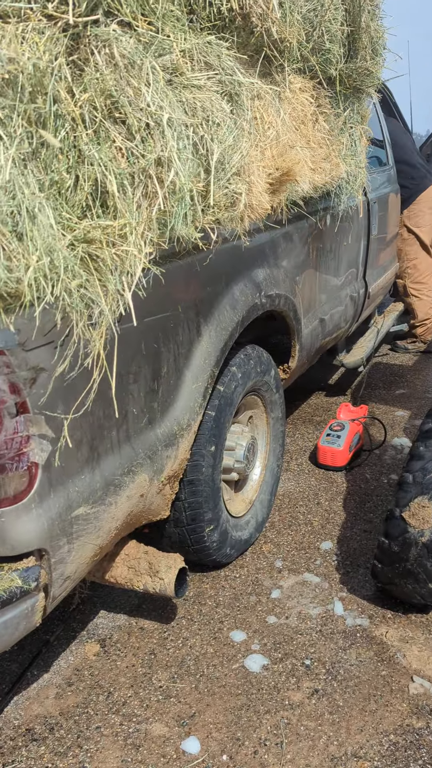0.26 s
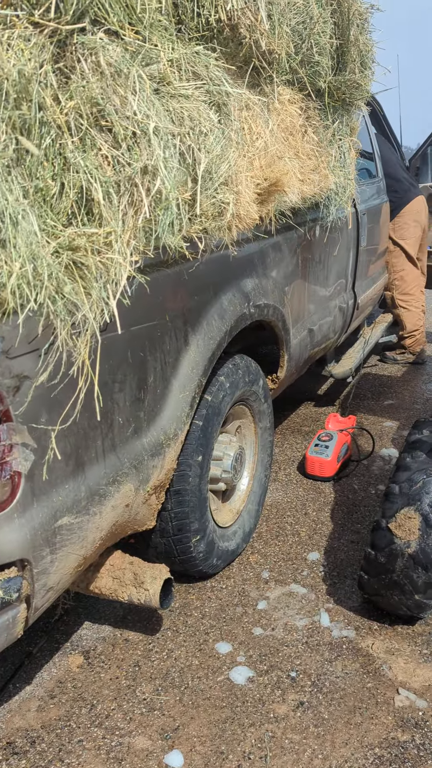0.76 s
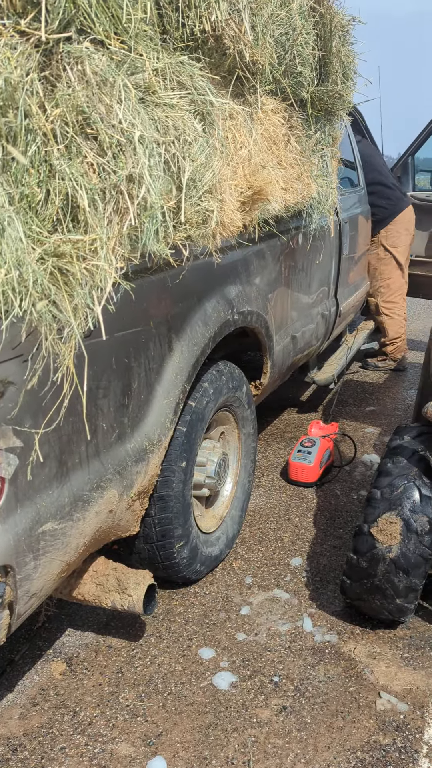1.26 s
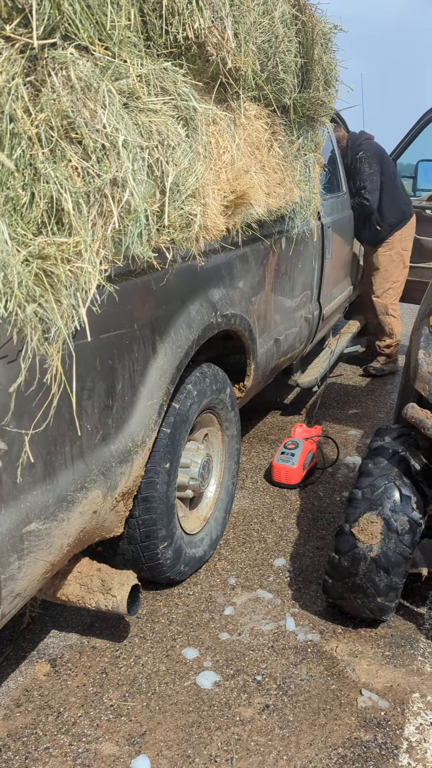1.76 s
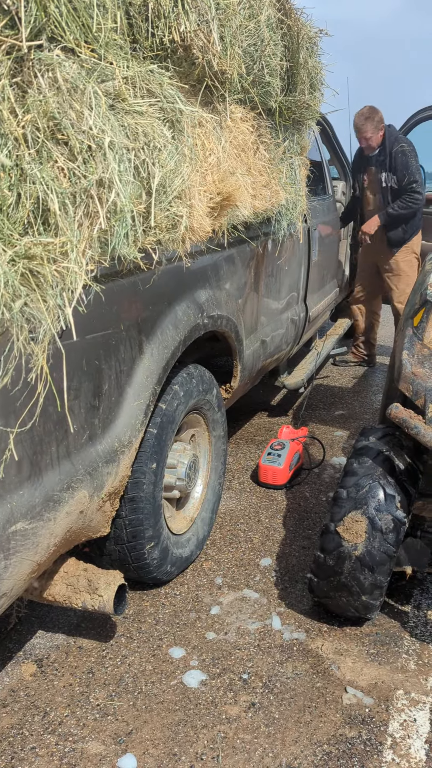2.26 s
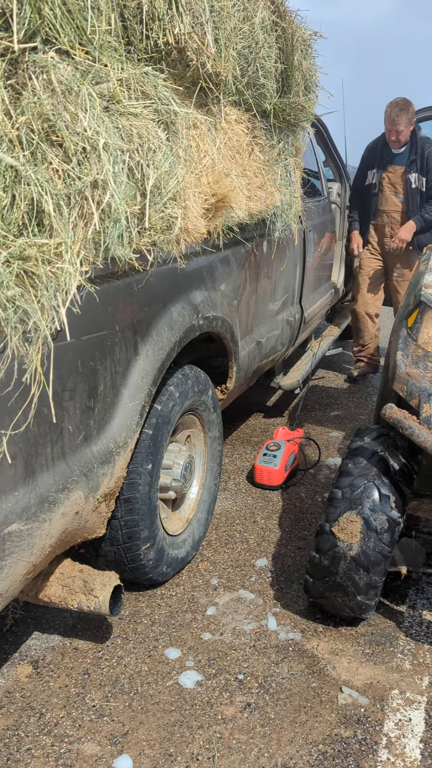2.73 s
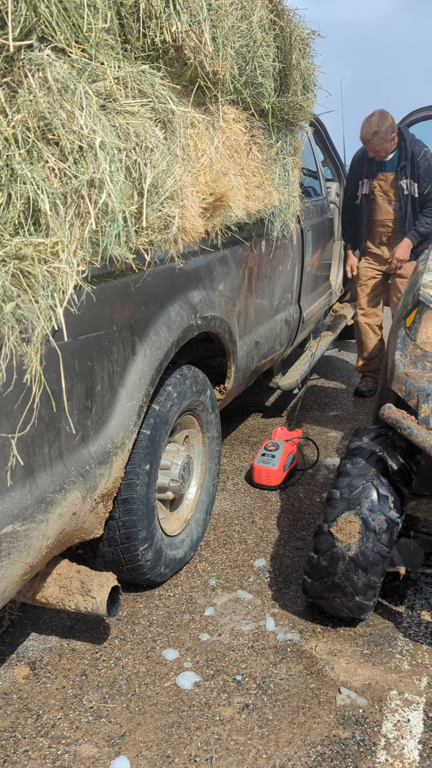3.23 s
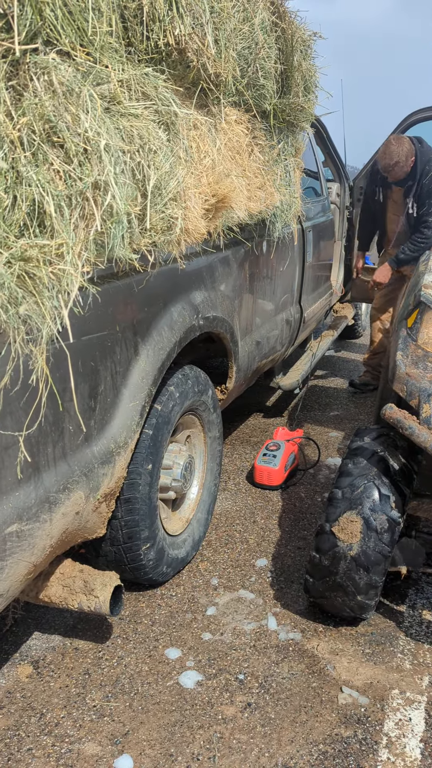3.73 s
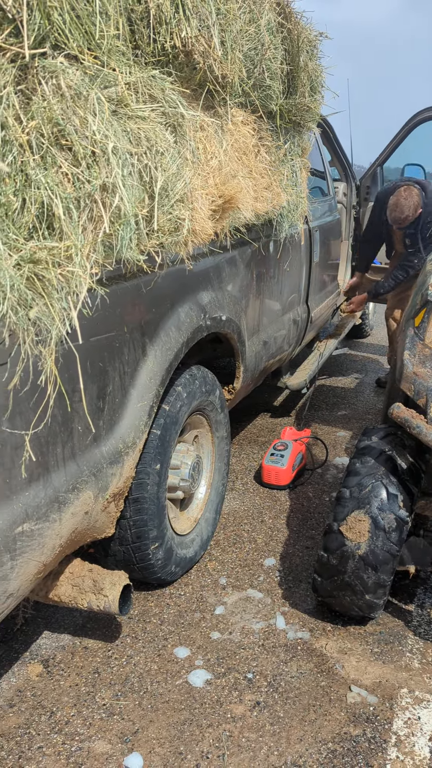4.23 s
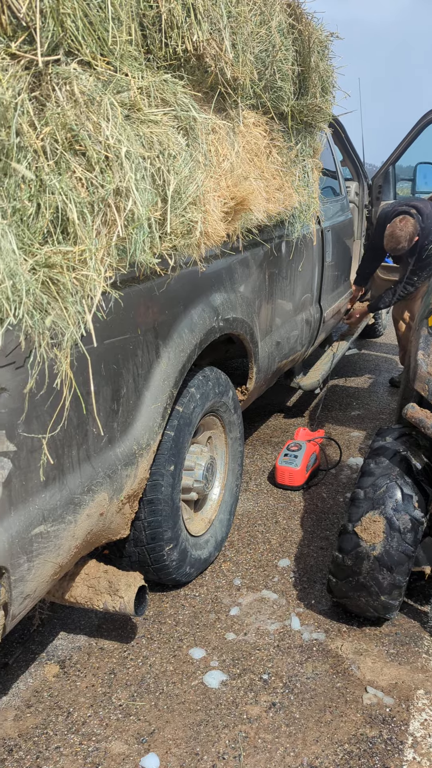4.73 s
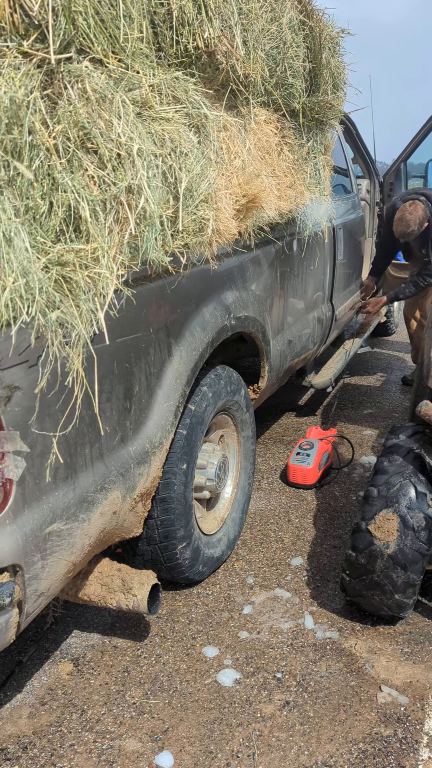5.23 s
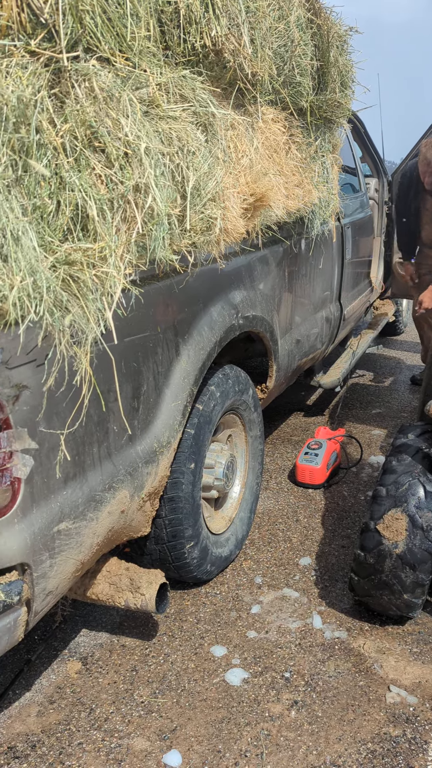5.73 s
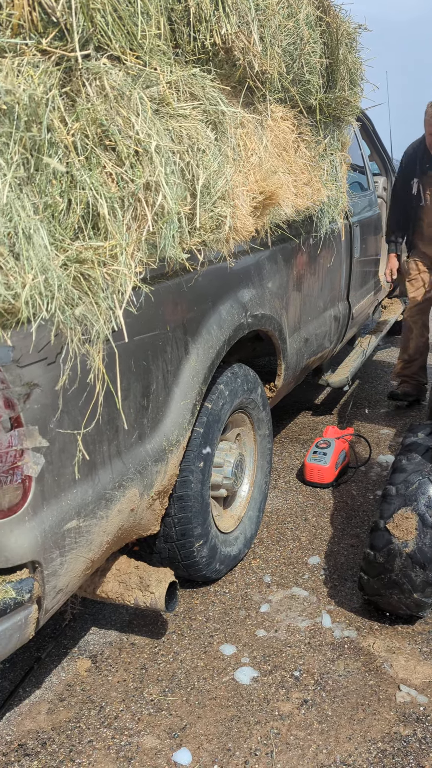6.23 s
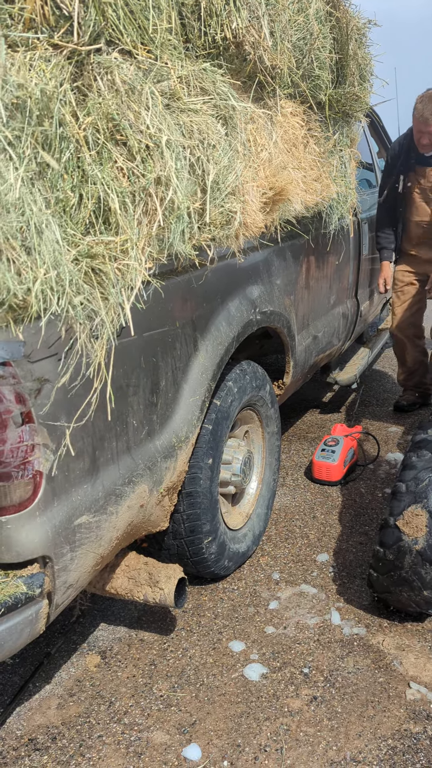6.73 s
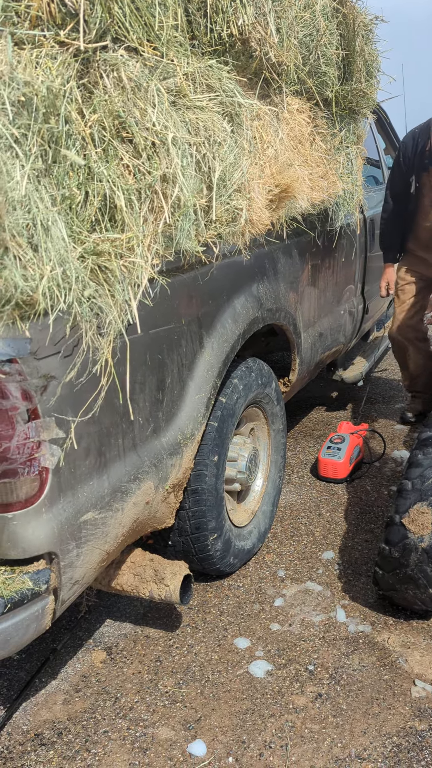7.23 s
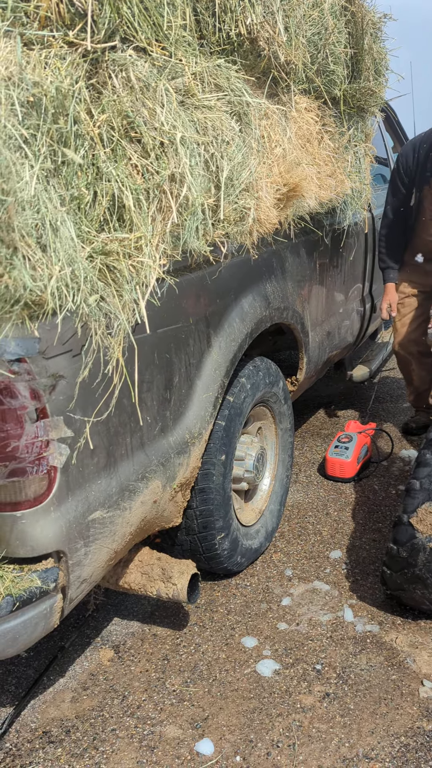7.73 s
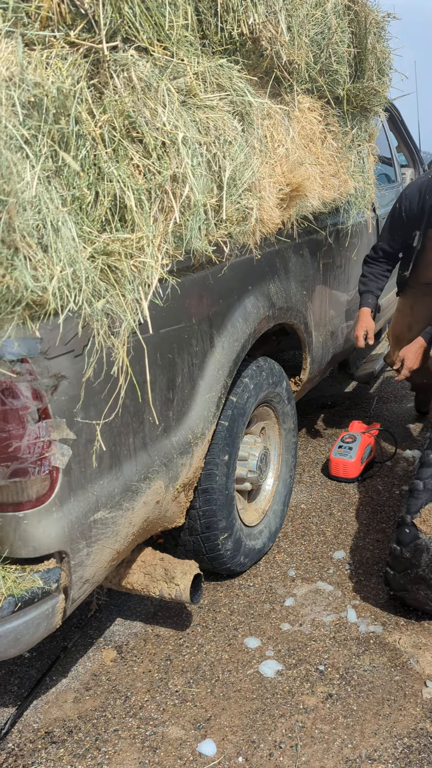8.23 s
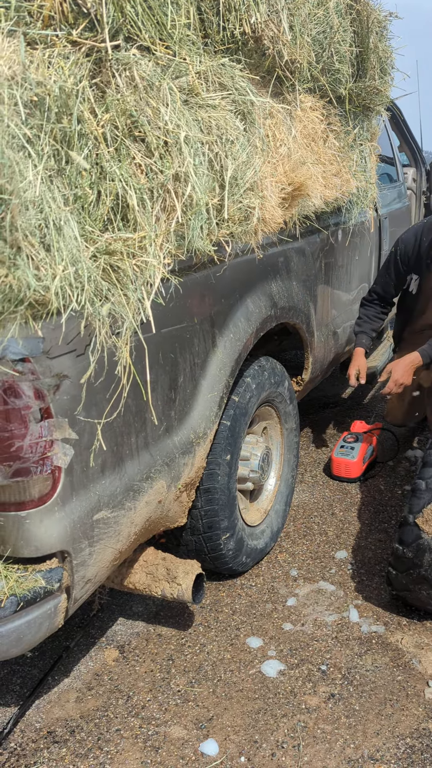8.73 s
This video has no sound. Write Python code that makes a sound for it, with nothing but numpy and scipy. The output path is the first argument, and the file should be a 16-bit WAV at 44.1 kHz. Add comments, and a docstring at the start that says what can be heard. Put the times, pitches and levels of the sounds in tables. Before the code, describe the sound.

A portable tire inflator starts beside a truck outdoors. Quiet airy rush comes first; the pump then catches abruptly and becomes a dense, hard plastic buzz of about fifty strokes per second. It loosens into a more uneven clatter and holds steadily. A low idle lies underneath, and wind buffets the left side of the nearby stereo handheld microphone, with faint short reflections from the truck.

```python
"""A soft rush of open air and a flutter of wind come first, with a truck idling faintly and then fuller beneath.
A small electric piston pump switches on to inflate a tire: its whine sums multiples of the crank speed, while
bursts of noise from valve, gears and air shake a resonant plastic shell and echo from the truck.
About two seconds later the pump runs faster and looser. Wind, as swells of low noise, flutters now and then,
mostly on the left microphone port."""
import sys
import numpy as np
from scipy.fft import rfft, irfft, next_fast_len
from scipy.io import wavfile
from scipy.ndimage import map_coordinates

SR = 44100
rng = np.random.default_rng(int(sys.argv[2]) if len(sys.argv) > 2 else 0)


def transcribe(u):
    """Save the signal u as a 16-bit wav file named by the first command-line argument.

    u: samples, shape (n,) or (channels, n), limited to [-1, 1]; the rate is SR.
    q: integer samples, one column per channel.
    """
    v = np.clip(np.atleast_2d(u).T, -1, 1)
    q = np.round(v * 32767).astype(np.int16)
    wavfile.write(sys.argv[1], SR, q)


N = 396459

# Open air and engine-bay rush, spectral shape: hz, relative_db_per_hz
AIR_SPECTRUM = [(25, -32), (42, -4), (65, -7.5), (120, -1.5), (160, -7), (209, 0.5), (290, -9), (490, -11),
                (800, -12), (1000, -22), (1450, -15.5), (6200, -23), (8130, -32.5), (15500, -36)]
# Open air, mean level: time_s, level_db
AIR_LEVEL = [(0, -56), (.6, -57), (.9, -54), (9, -52)]
# Wind eddies at set times, loud and soft: peak_s, left_level_db, length_s, centre_hz, right_minus_left_db
TIMED_EDDIES = [(0.067, -46, 0.049, 219, -17), (.3, -59.5, .045, 440, 4), (.54, -56, 0.011, 200, 3),
                (1.614, -40, 0.02, 121, -6), (1.777, -30, 0.0033, 240, -10),
                (5.448, -37.5, 0.021, 169, -22), (5.558, -40.5, 0.029, 287, -14),
                (6.215, -30.5, .022, 312, -21), (6.261, -32, 0.015, 140, -12), (6.573, -36, .017, 212, -12),
                (7.128, -42, .03, 120, -12), (7.461, -38, 0.031, 216, -2), (7.649, -46, 0.049, 115, -7)]
# Exhaust puff, spectral shape: hz, relative_db_per_hz
PUFF_SPECTRUM = [(25, -36), (45, -32), (70, 7.5), (105, 7), (200, 6.5), (280, -10), (500, -6.5),
                 (1200, -55)]
# Engine hum, before the swell and waver: multiple_of_engine_speed (rounded in use), level_db
IDLE_HUM_ORDERS = [(4, -78), (5, -66.5), (8, -75), (9, -68.5), (12, -66.5)]
# Looseness of the piston stroke: time_s, looseness (0-1)
LOOSENESS = [(2.5, 0), (2.72, 1)]
# Crank harmonics at full drive, before force and waver:
# multiple_of_crank_speed (rounded in use), tight_db, loose_db
WHINE_ORDERS = [(6.03, -62, -65), (10.01, -65, -61), (10.99, -51.5, -51.5), (11.966, -47.5, -48),
                (13, -48, -58.5), (13.97, -87, -63), (15, -58, -61), (16.97, -63, -66.5),
                (19, -58.5, -65.5), (20, -83, -60), (21.94, -57, -62.5), (23.94, -61.5, -57),
                (24.93, -48.5, -58), (26.05, -53, -66.5), (32, -60, -53.5), (37, -57.5, -55),
                (38.9, -52, -74), (40, -56, -72), (41.33, -51, -55.5), (51, -55, -75), (52.64, -85, -55.5),
                (69.2, -57.5, -64)]
# Bursts in each crank turn, against the steady noise, before force and scatter:
# place_in_turn (0-1), length_turns, tight_db, loose_db, low_hz, high_hz
STROKE_BURSTS = [(0.97, 0.049, 3, 2, 370, 796), (0.67, 0.078, 5.5, 2, 620, 1427),
                 (0.93, 0.14, 4, 2, 1420, 2625), (0.64, 0.42, 0.5, 1.5, 2690, 4970),
                 (0.74, 0.2, 5, 4, 4940, 7500), (0.5, 0.12, 1, 2, 7370, 15500)]
# Likeness of the pump noise in left and right: hz, correlation (0-1)
PUMP_LIKENESS = [(300, 0.48), (650, 1), (1200, 0.71), (2000, 1), (5000, 0.43), (15000, 0.63)]
# Broad response of the plastic shell: hz, relative_db_per_hz
SHELL_RESPONSE = [(330, -42), (450.0, -33), (560.0, -7.5), (900.0, -4.5), (1400.0, -10), (1900.0, 1.5),
                  (2800.0, -2.5), (3800.0, -4), (5000.0, -11.5), (7300.0, -9.5), (9500.0, -11),
                  (12000.0, -7.5), (13500.0, -16.5), (15600.0, -7)]
# Resonances and dips of the shell: centre_hz, width_hz, lift_db
SHELL_RESONANCES = [(593, 170, 6.5), (939, 20, 8), (1270, 99, 10), (1506, 133, 10), (1623, 35, 8),
                    (1831, 50, 6.5), (2112, 376, 6.5), (2566, 32, 6.5), (2770, 70, -4.5), (2870, 260, 3),
                    (3310, 92, 5.5), (3410, 190, 3.5), (3800, 190, -4.5), (4327, 205, 7.5),
                    (5040, 135, -2.5), (5804, 1280, 12), (6600, 300, 5.5), (6860, 250, -3.5),
                    (10200, 1100, 5)]
# Echoes from the truck's side and wheel: mean_delay_s, gain (linear)
PANEL_ECHOES = [(.0029, 0.087), (.0047, 0.15)]
# Rattle drive, before a common gain in pump(): time_s, level_db
RATTLE_LEVEL = [(.8, -39), (2.8, -40.2), (6.1, -40.5), (7.2, -39.5)]
# Treble hiss drive, before a common gain and flicker in pump(): time_s, level_db
HISS_LEVEL = [(.8, -47), (2.2, -46.5), (2.7, -48), (5.1, -46.5), (6.4, -48), (6.8, -49.5), (9, -47)]
# Gain of the rattle's lower middle: time_s, gain_db
MIDDLE_GAIN = [(2.3, 1), (2.8, -3), (6.2, -3), (8.4, 6)]
# Level difference of the pump between the sides: hz, left_minus_right_db
PUMP_PAN_CURVE = [(300, -3.5), (620, 0.7), (1000, 2.5), (1290, -0.5), (1700, 0), (2100, -0.5), (3100, 7),
                  (4300, -5.5), (5800, -11), (7000, -2), (8200, -6), (11000, -1), (13000, .5)]

# Random faint eddies: eddies per s, mean left level and half-range (dB), length (s), centre (Hz),
# right minus left (dB)
FAINT_PER_S = 1.5
FAINT_DB, FAINT_SCATTER_DB, FAINT_S, FAINT_HZ, FAINT_RIGHT_DB = -51.5, 4, 0.012, 290, -0.5
# One longer gust: peak (s), length (s), left level (dB), centre (Hz), right minus left (dB)
GUST_AT, GUST_S, GUST_DB, GUST_HZ, GUST_RIGHT_DB = 6.28, 0.22, -41, 167, -18
SWITCH_ON_S = .673
# Crank speed (turns per s): under load, extra until the hose fills, extra at full looseness
TURN_RATE, UNLOADED_RATE, LOOSE_RATE = 50.5, .4, .45
# Filling time of the hose (s), speed gain while loose (turns per s each s), crank position at rest (turns)
FILL_S, CLIMB_PER_S, REST_PLACE = .45, .12, .92
# Drive (0-1) of the first stir and of the catching piston; rise of the stir (s)
STIR_SHARE, CATCH_SHARE, STIR_S = .06, 0.26, 0.01
# Delay of the catch, its rise, and time constant of the build-up to full drive (s)
CATCH_AFTER_S, CATCH_S, BUILD_S = 0.019, 0.0062, 0.064
MIDDLE_HZ, MIDDLE_WIDTH_HZ = 1200, 220  # centre and standard deviation of the lower middle
FLICKER_DB, FLICKER_RATE = 1.07, 7.7  # treble flicker: scale (dB), random knots per s
TOP_HZ = 15830


def amp(db):
    """Logarithmic level: decibels become an amplitude ratio."""
    return 10 ** (np.asarray(db) / 20)


def unit(x):
    """Normalisation: x is brought to root-mean-square 1."""
    return x / np.sqrt(np.mean(x ** 2) + 1e-20)


def along(points, hz):
    """Spectral interpolation: (hz, value) points are joined on a logarithmic frequency axis."""
    f, v = np.transpose(points)
    return np.interp(np.log(hz + 1), np.log(f + 1), v)


def curves(rows):
    """Linear interpolation in time: one value per sample for each column after time_s."""
    s, *cols = np.transpose(rows)
    return [np.interp(np.arange(N) / SR, s, c) for c in cols]


def wobble(rate):
    """Slow random fluctuation: a smooth curve through chance values, rate knots per s."""
    coarse = np.arange(0, N + 32, 32)
    knots = rng.standard_normal(4000)
    coarse_curve = map_coordinates(knots, [coarse * rate / SR], mode="wrap")
    return np.interp(np.arange(N), coarse, coarse_curve)


def filtered(x, response):
    """Linear filtering: the spectrum of x is multiplied by a complex response of frequency."""
    size = next_fast_len(N + 8192)
    hz = np.fft.rfftfreq(size, 1 / SR)
    return irfft(rfft(x, size) * response(hz), size)[..., :N]


def spread(pair, alike):
    """Partial coherence: two unrelated signals mix into left and right of the given correlation."""
    turn = lambda hz: np.arccos(np.clip(along(alike, hz), -1, 1)) / 2
    mid, side = filtered(pair, lambda hz: np.array([np.cos(turn(hz)), np.sin(turn(hz))]))
    return np.array([mid + side, mid - side])


def outdoors():
    """Broadband turbulence: shaped noise gives the engine-bay rush and open air, gently wavering."""
    noise = spread(rng.standard_normal((2, N)), [(50, 0.25), (200, 0.82), (1000, 0.77), (6000, 0.1)])
    rush = unit(filtered(noise, lambda hz: amp(along(AIR_SPECTRUM, hz))))
    level_db = curves(AIR_LEVEL)[0] + 0.94 * wobble(7)
    return amp(level_db) * rush


def flutter(t, db, length, centre_hz, right_db, width_octaves=0.79, top_hz=480):
    """Local wind pressure: low noise swells around t = 0, independent on the two ports."""
    hz = np.fft.rfftfreq(len(t), 1 / SR) + 1
    octaves = np.log2(hz / centre_hz)
    colour = np.exp(-.5 * (octaves / width_octaves) ** 2) / (1 + (hz / top_hz) ** 8)
    swell = np.exp(-.5 * (t / length) ** 2)
    noise = irfft(rfft(rng.standard_normal((2, len(t))) * swell) * colour, len(t))
    # each port receives the energy of the swell at its own level
    noise = noise * np.linalg.norm(swell) / np.linalg.norm(noise, axis=1, keepdims=True)
    return amp([[db], [db + right_db]]) * noise


def wind():
    """Intermittent turbulence: a gust, eddies at set times and random faint ones flutter on the ports."""
    out = np.zeros((2, N + 2 * SR))  # padded for eddies that overlap the ends
    t = np.arange(SR) / SR - .5
    gust = (GUST_AT, GUST_DB, GUST_S, GUST_HZ, GUST_RIGHT_DB)
    faint = []
    for when, strength in rng.random((int(FAINT_PER_S * N / SR), 2)):
        level_db = FAINT_DB + FAINT_SCATTER_DB * (2 * strength - 1)
        faint.append((when * N / SR, level_db, FAINT_S, FAINT_HZ, FAINT_RIGHT_DB))
    for peak_s, *eddy in [gust] + TIMED_EDDIES + faint:
        first = max(round(peak_s * SR), 0)
        out[:, first:first + len(t)] += flutter(t, *eddy)
    return out[:, SR // 2:][:, :N]


def truck(puff_db=-58, scatter_db=4.0, waver_db=3.0):
    """Periodic combustion: harmonics of engine speed hum, and one exhaust puff stands out in each turn."""
    turn_rate, first_s = 10.29, .054  # turns per s, time of the first puff
    times = np.arange(first_s, N / SR, 1 / turn_rate)
    puffs = np.zeros(N)
    puffs[(times * SR).astype(int)] = amp(scatter_db * rng.standard_normal(len(times)))
    thump = unit(filtered(puffs, lambda hz: amp(along(PUFF_SPECTRUM, hz))))
    angle = 2 * np.pi * turn_rate * (np.arange(N) / SR - first_s)
    hum = np.zeros(N)
    for order, db in IDLE_HUM_ORDERS:
        hum += amp(db + waver_db * wobble(3.08)) * np.sin(round(order) * angle)
    swell_db, = curves([(.5, -16), (.75, -1.5)])  # time_s, gain_db
    return amp(swell_db) * (amp(puff_db) * thump + np.sqrt(2) * hum)


def crank(running, loose):
    """Load and speed: the crank slows as the hose fills, then gains speed steadily once the stroke is loose."""
    loose_for = np.cumsum(loose) / SR
    filling = UNLOADED_RATE * np.exp(-abs(running) / FILL_S)
    speed = TURN_RATE + filling + LOOSE_RATE * loose + CLIMB_PER_S * loose_for
    return REST_PLACE + np.cumsum(speed * (running > 0)) / SR


def start_up(running):
    """Starting transient: drive (0-1) stirs at the switch, jumps as the piston catches, then builds up."""
    pumping = np.maximum(running - CATCH_AFTER_S, 0)
    build = 1 - (1 - CATCH_SHARE) * np.exp(-pumping / BUILD_S)
    power = np.minimum(pumping / CATCH_S, 1) * build
    stir = STIR_SHARE * np.clip(running / STIR_S, 0, 1)
    return np.maximum(power, stir)


def whine(turns, loose, force, waver_db=0.28, scatter=0.1):
    """Harmonic series: multiples of crank speed meet in one swell each time the valve opens."""
    valve_at = .91  # place in the turn
    tone = np.zeros(N)
    for order, tight_db, loose_db in WHINE_ORDERS:
        # the higher harmonics are less tightly in step
        offset = rng.uniform(-.2, .2) * (order > 14.5)
        waver = waver_db * (.5 + loose / 2) * wobble(9)
        level = tight_db + loose * (loose_db - tight_db) + waver
        angle = 2 * np.pi * (round(order) * (turns - valve_at) + offset)
        tone += np.sqrt(2) * amp(level) * np.cos(angle + scatter * wobble(20))
    return tone * force


def sing(hz=730, db=-61.0, waver_db=3, drift=0.83):
    """Sustained resonance: shaking keeps one lightly damped shell mode ringing, wavering in level and phase."""
    angle = 2 * np.pi * hz * np.arange(N) / SR + drift * wobble(12)
    return np.sqrt(2) * amp(db + waver_db * wobble(14)) * np.sin(angle)


def per_turn(turns, count):
    """Cyclic variation: count rows of chance values, new for each crank turn and joined linearly."""
    draws = rng.standard_normal((count, 600))
    return np.array([np.interp(turns, np.arange(len(row)), row) for row in draws])


def rattle(turns, loose, force, repeat=0.09, loose_repeat=0.093, mesh=0.15,
           tight_scatter_db=2.0, loose_scatter_db=3):
    """Modulated noise: valve, piston and escaping air burst once a turn, and gear teeth chop the noise."""
    share = np.clip(repeat + loose * (loose_repeat - repeat), 0, 1)
    # the same surfaces meet in every turn, so part of the noise repeats
    track = rng.standard_normal((2, 860))
    same = np.array([row[(turns % 1 * len(row)).astype(int)] for row in track])
    fresh = rng.standard_normal((2, N))
    noise = spread(np.sqrt(share) * same + np.sqrt(1 - share) * fresh, PUMP_LIKENESS)
    teeth = 1 + mesh * np.cos(2 * np.pi * 8 * turns)  # eight meshings a turn
    scatter_db = tight_scatter_db + loose * (loose_scatter_db - tight_scatter_db)
    chances = per_turn(turns - .75, count=len(STROKE_BURSTS))
    out = np.zeros((2, N))
    for (place, length, tight_db, loose_db, low_hz, high_hz), chance in zip(STROKE_BURSTS, chances):
        from_burst = (turns - place + .5) % 1 - .5
        burst = np.exp(-.5 * (from_burst / length) ** 2)
        level_db = tight_db + loose * (loose_db - tight_db) + scatter_db * np.tanh(chance)
        size = force * amp(level_db)
        gate = np.sqrt(1 + size ** 2 * burst)
        below = lambda hz, edge: 1 / (1 + (hz / edge) ** 16)
        band = lambda hz: np.sqrt(abs(below(hz, high_hz) - below(hz, low_hz)))
        out += filtered(noise * unit(gate * teeth), band)
    return out


def shell(x, ripple_db=2.5, spacing_hz=110, dense_from_hz=2800):
    """Modal response: the plastic shell has a few strong modes and a thicket of small ones in the treble."""
    small = rng.standard_normal(1000)
    modes = np.arange(len(small))
    ripple = lambda hz: ripple_db * np.interp(hz / spacing_hz, modes, small) * (hz > dense_from_hz)
    lift = lambda hz: sum(db / (1 + (2 * (hz - centre) / width) ** 2)
                          for centre, width, db in SHELL_RESONANCES)
    return filtered(x, lambda hz: amp(along(SHELL_RESPONSE, hz) + lift(hz) + ripple(hz)))


def panels(x, sway=0.024):
    """Interference by reflection: short echo delays drift as the hand-held microphone sways."""
    n = np.arange(N)
    out = x.copy()
    for delay, gain in PANEL_ECHOES:
        earlier = n - delay * SR * (1 + sway * wobble(0.81))
        out += gain * np.array([np.interp(earlier, n, side) for side in x])
    return out


def lower_middle(x):
    """Time-varying band gain: the lower middle thins as the stroke loosens, and later fills again."""
    band = filtered(x, lambda hz: np.exp(-.5 * ((hz - MIDDLE_HZ) / MIDDLE_WIDTH_HZ) ** 2))
    return x + (amp(curves(MIDDLE_GAIN)[0]) - 1) * band


def place_pump(sound, lag_s=.000085):
    """Directional cues: each band has its own level difference, and sound reaches the right port first."""
    sides = np.array([[1], [-1]])
    pan = lambda hz: amp(sides * along(PUMP_PAN_CURVE, hz) / 2)
    even_power = lambda hz: pan(hz) / np.sqrt(np.mean(pan(hz) ** 2, 0))
    return filtered(sound, lambda hz: even_power(hz) * np.exp(-1j * np.pi * hz * lag_s * sides))


def pump(rattle_db=5.0, air_db=12, split_hz=7000, tight_db=0.7, loose_db=2.0, rattle_follows=0.68,
         jitter=0.0033, start_jitter=0.036, settle_s=0.11, surge_db=9):
    """Crank-driven vibration: whine, rattle and hiss share one cycle; a loose stroke varies in force and timing."""
    (loose,), (body_db,), (hiss_db,) = curves(LOOSENESS), curves(RATTLE_LEVEL), curves(HISS_LEVEL)
    running = np.arange(N) / SR - SWITCH_ON_S
    # on starting, the motor pulls hard and the crank stumbles before it settles
    inrush = np.exp(-abs(running) / settle_s)
    stumble = (jitter * loose + start_jitter * inrush) * wobble(35)
    turns = crank(running, loose) + stumble
    # the cap limits the strong strokes, while some fall well short
    force_db = (tight_db + loose * (loose_db - tight_db)) * np.minimum(wobble(30), .6)
    force = amp(force_db)
    noise = unit(panels(shell(rattle(turns, loose, force ** rattle_follows))))
    body = lower_middle(filtered(noise, lambda hz: 1 / (1 + (hz / split_hz) ** 8)))
    tones = whine(turns, loose, force * amp(surge_db * inrush)) + sing()
    flicker_db = FLICKER_DB * wobble(FLICKER_RATE)
    hiss = amp(hiss_db + air_db + flicker_db) * (noise - body)
    sound = start_up(running) * (amp(body_db + rattle_db) * body + hiss + tones)
    return place_pump(sound)


def scene():
    """Superposition: open air, wind, truck and pump add."""
    return outdoors() + wind() + truck() + pump()


def record(dry):
    """Band limitation: nothing at or above TOP_HZ is kept."""
    return filtered(dry, lambda hz: hz < TOP_HZ)


dry = scene()
out = record(dry)
transcribe(out)
```